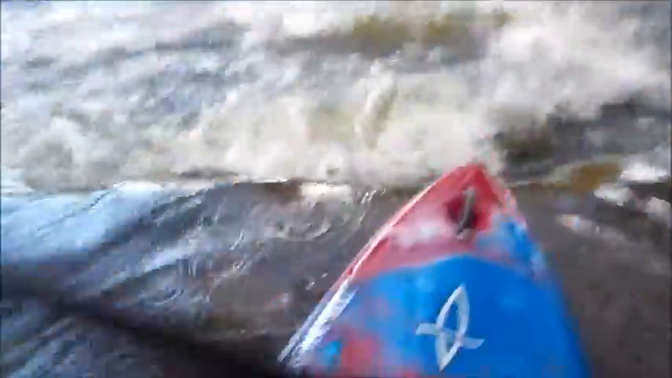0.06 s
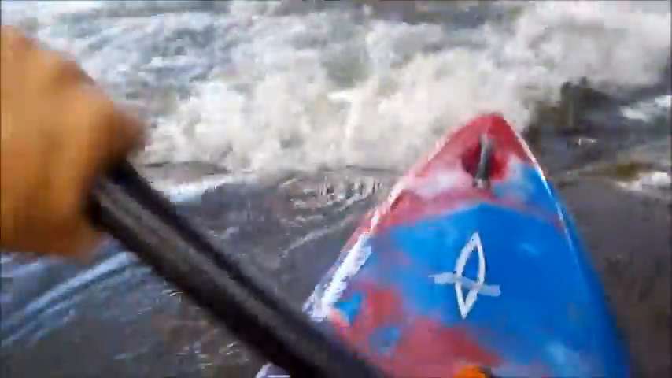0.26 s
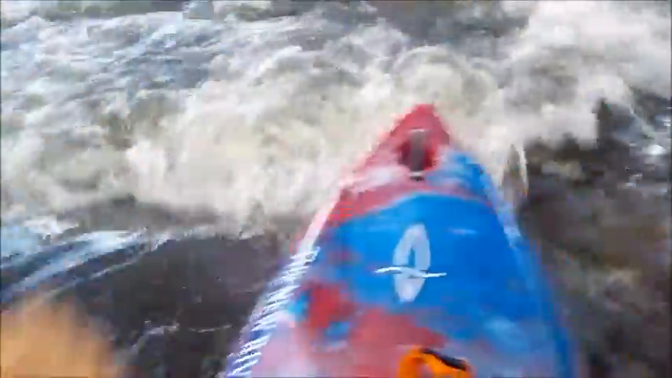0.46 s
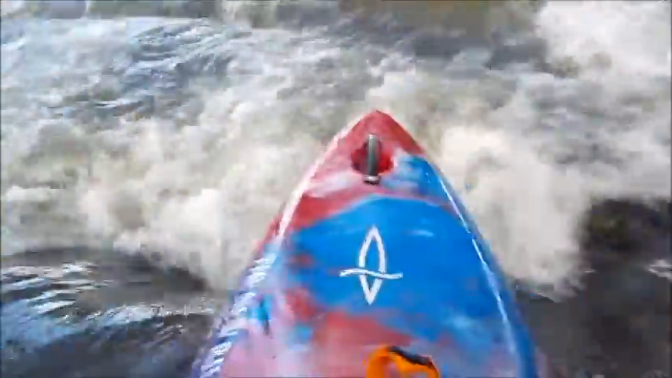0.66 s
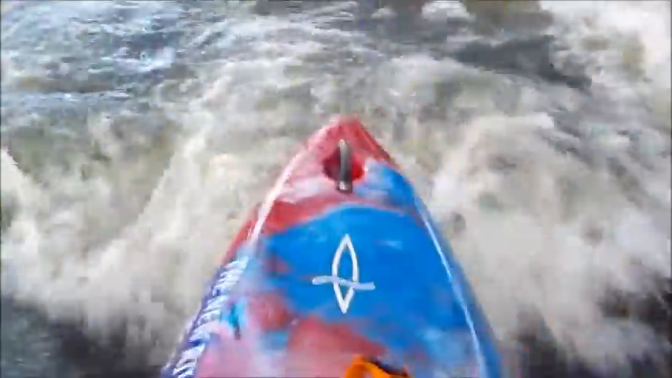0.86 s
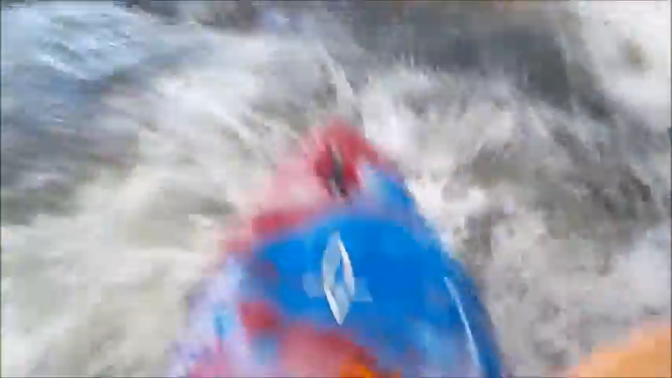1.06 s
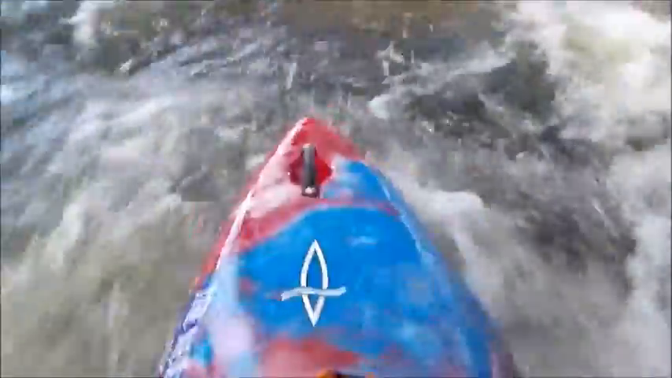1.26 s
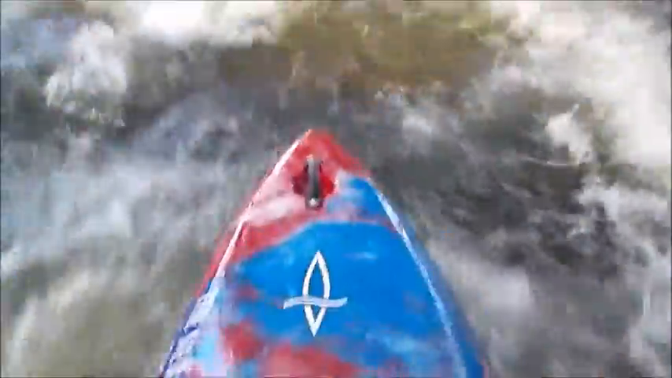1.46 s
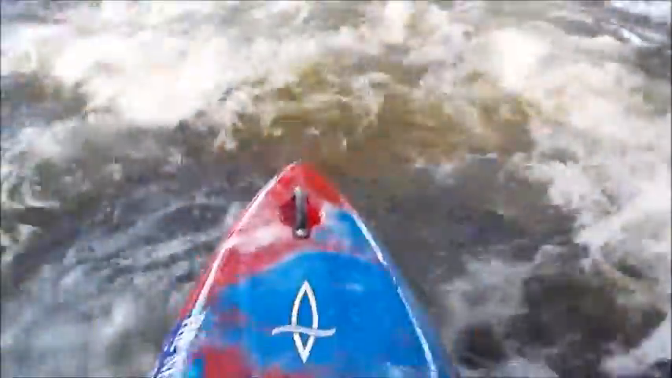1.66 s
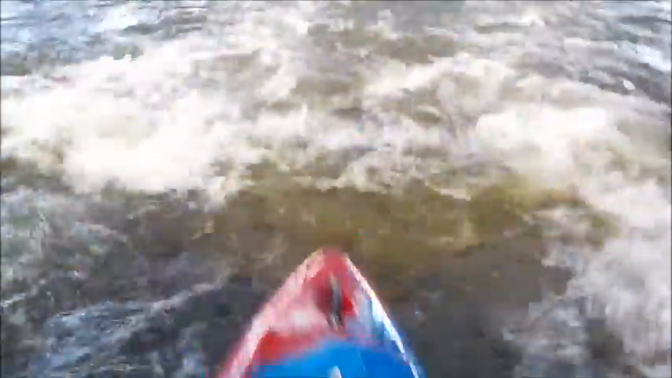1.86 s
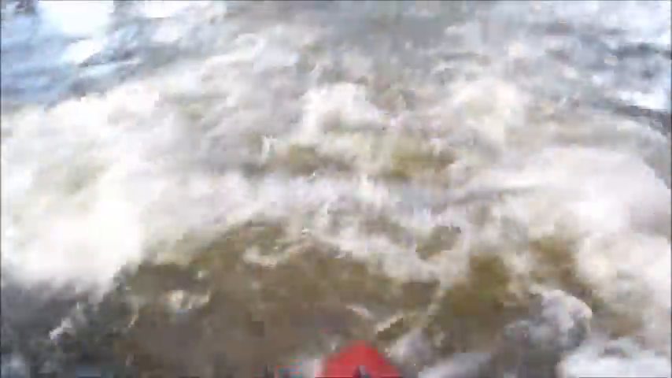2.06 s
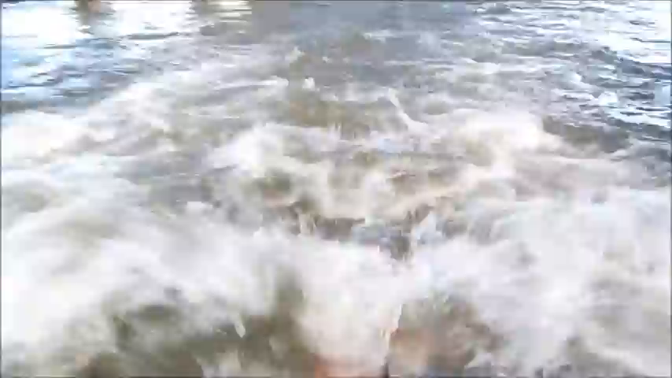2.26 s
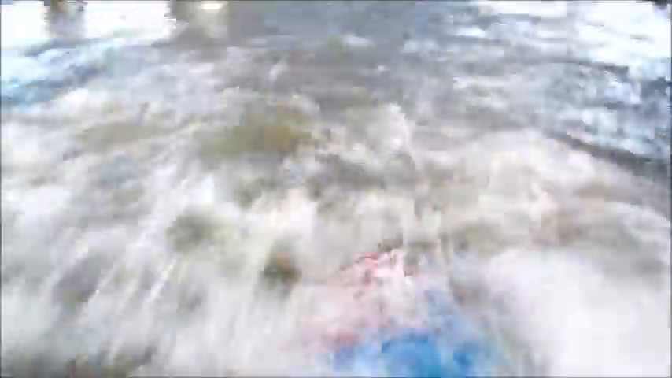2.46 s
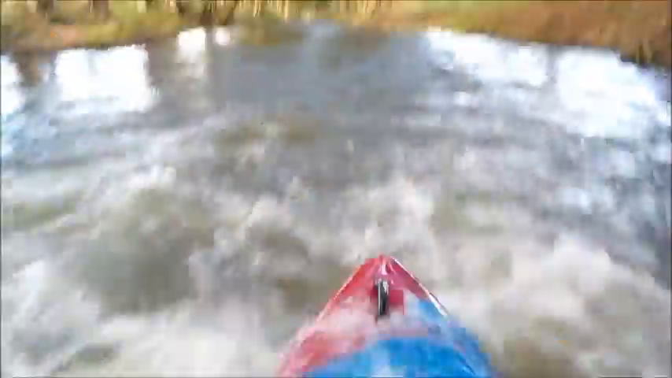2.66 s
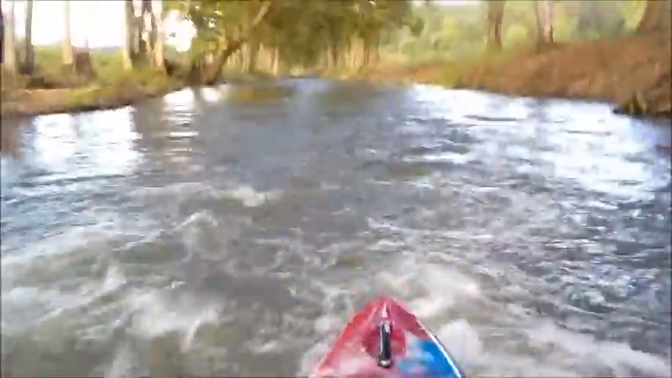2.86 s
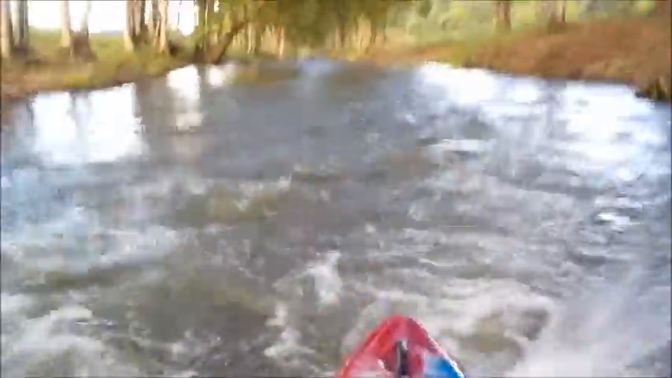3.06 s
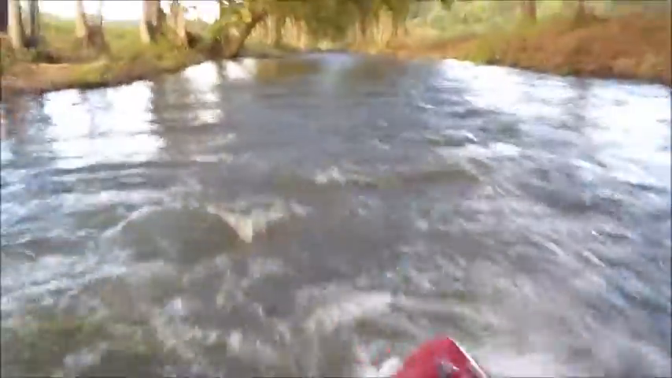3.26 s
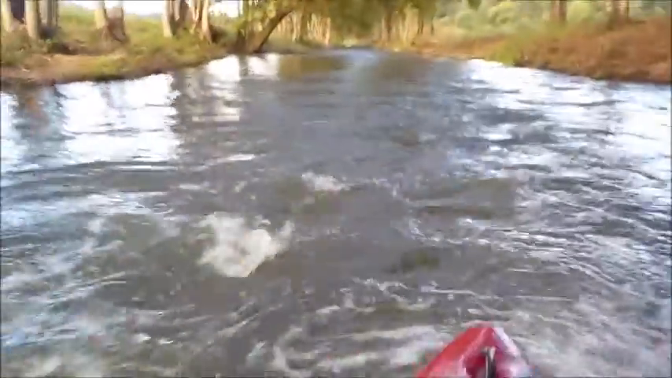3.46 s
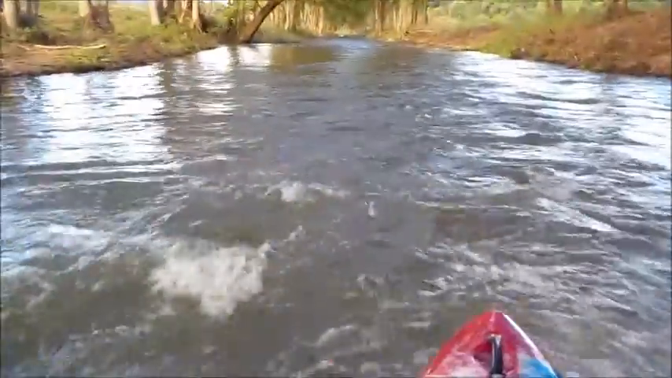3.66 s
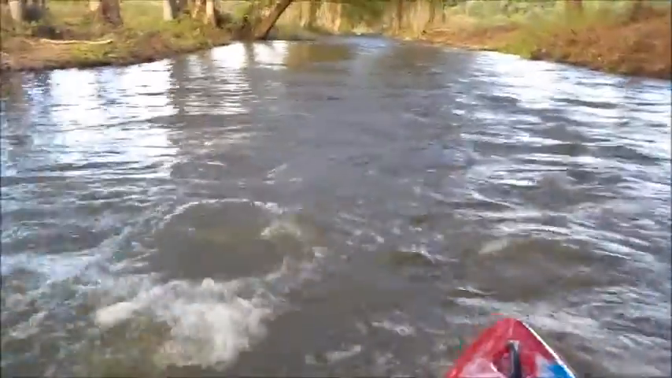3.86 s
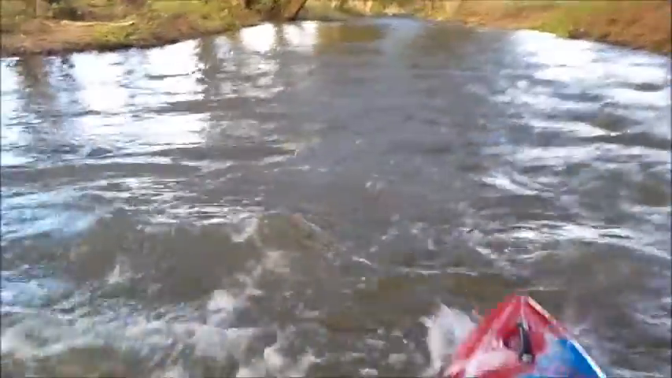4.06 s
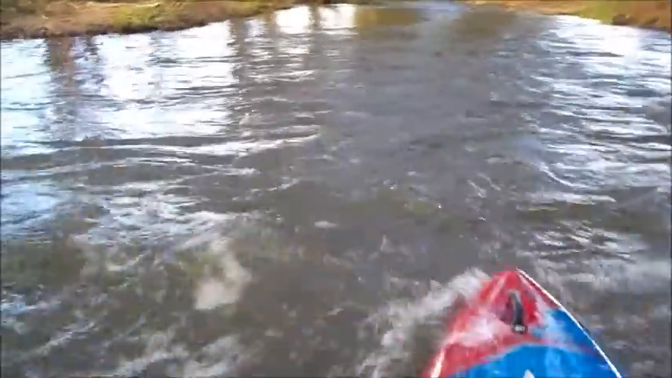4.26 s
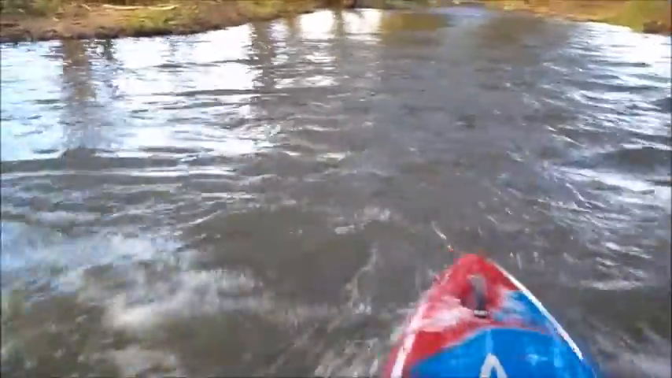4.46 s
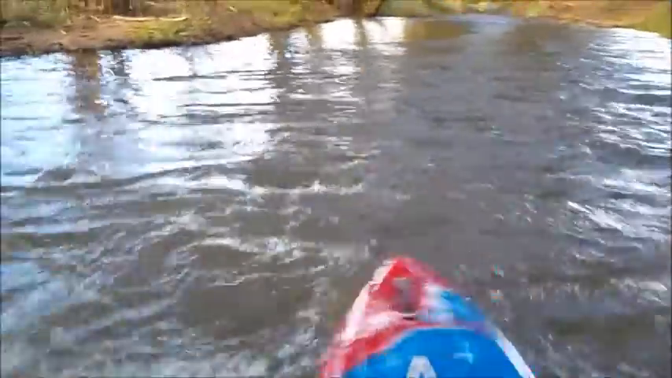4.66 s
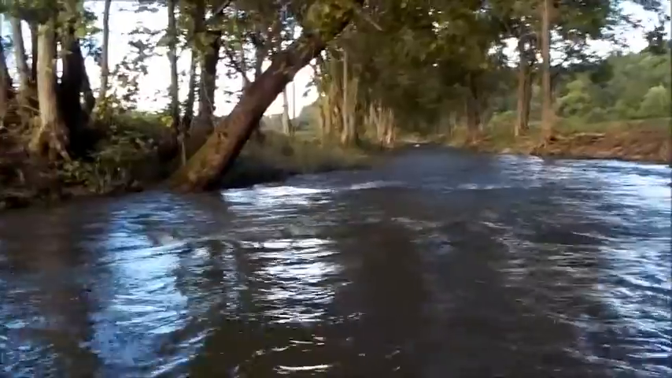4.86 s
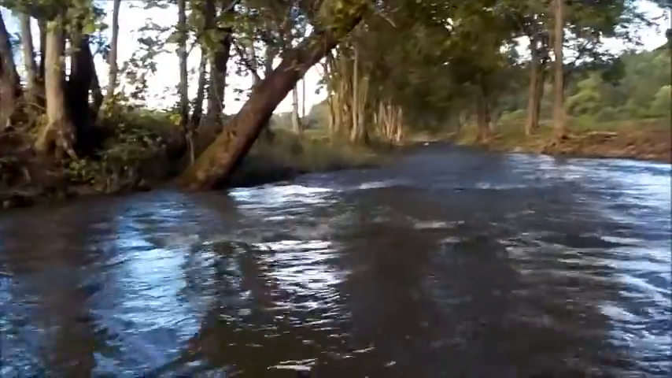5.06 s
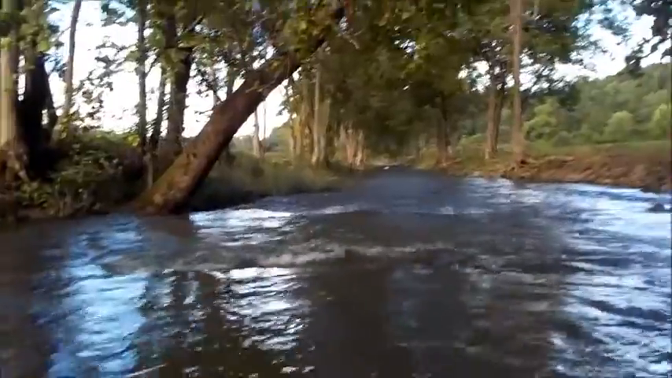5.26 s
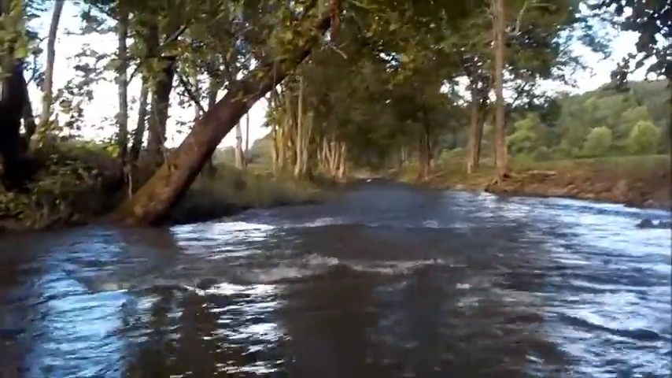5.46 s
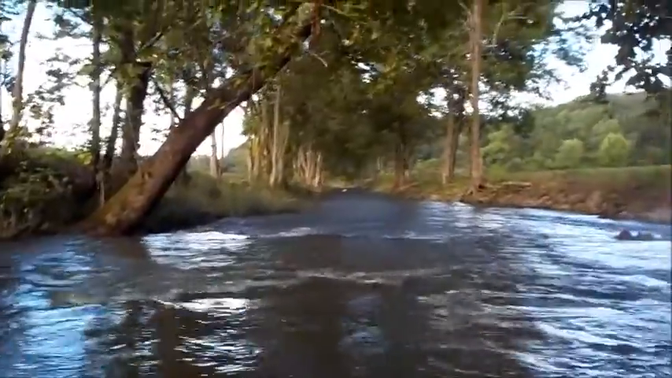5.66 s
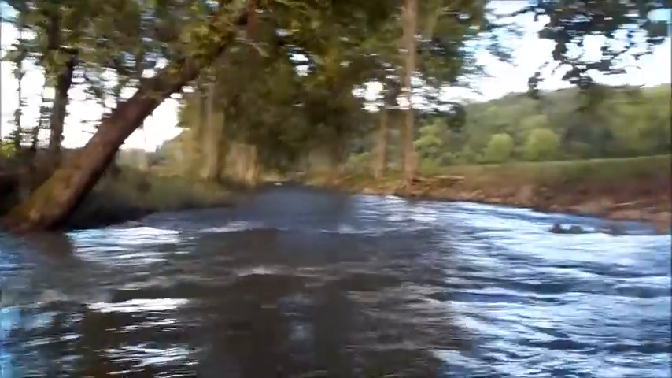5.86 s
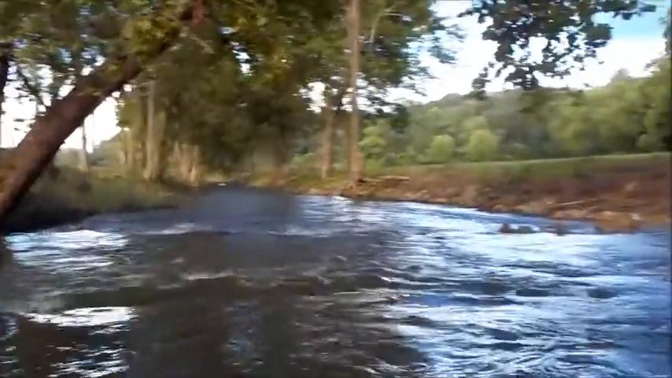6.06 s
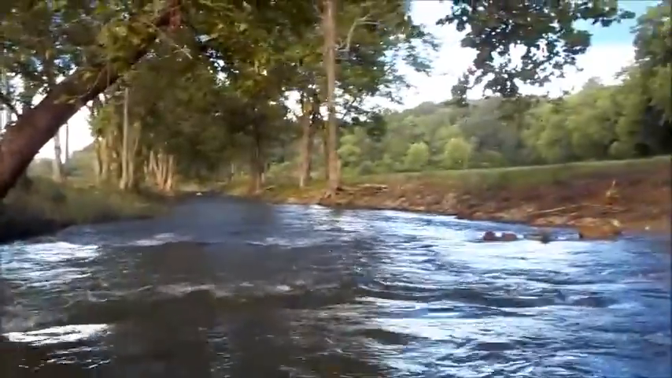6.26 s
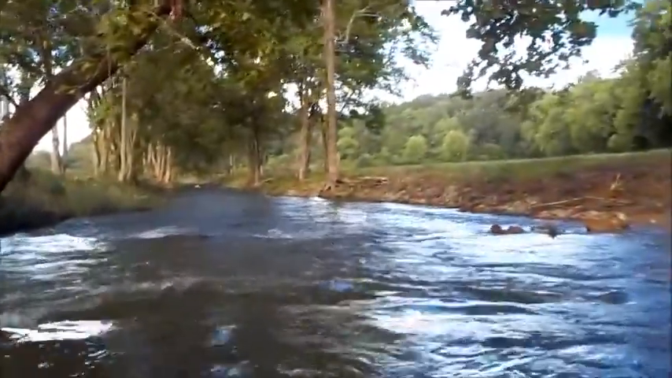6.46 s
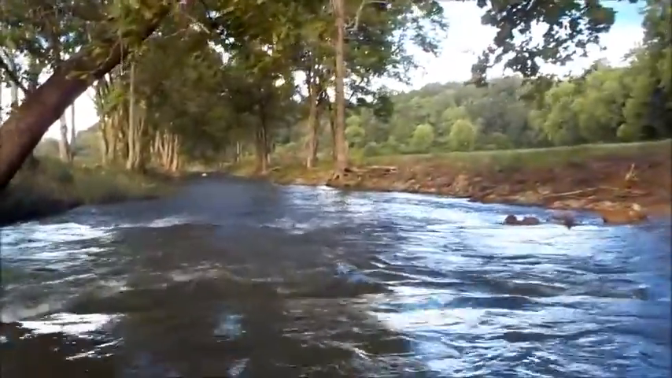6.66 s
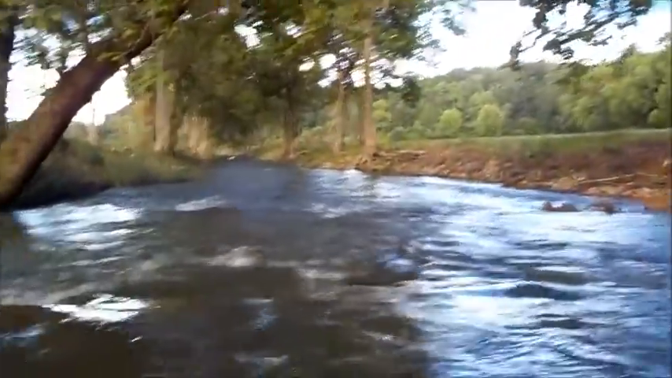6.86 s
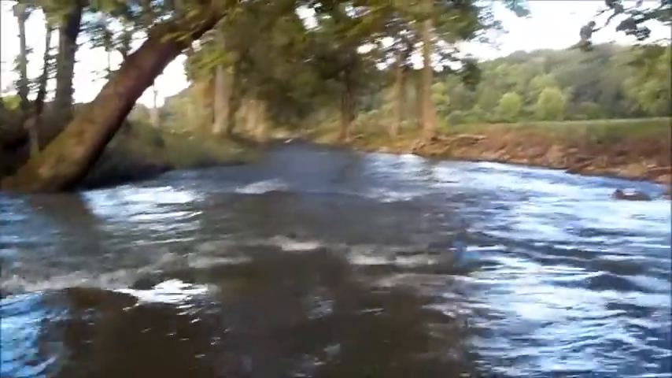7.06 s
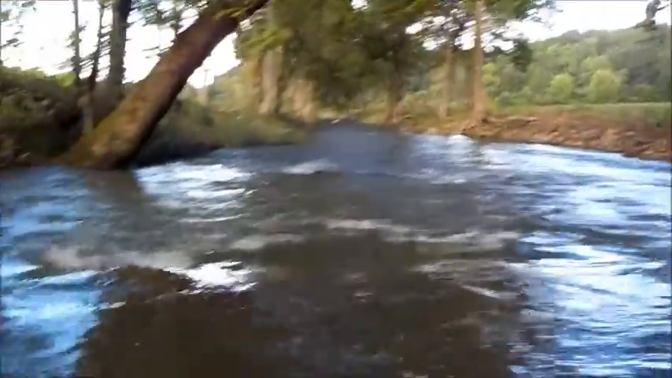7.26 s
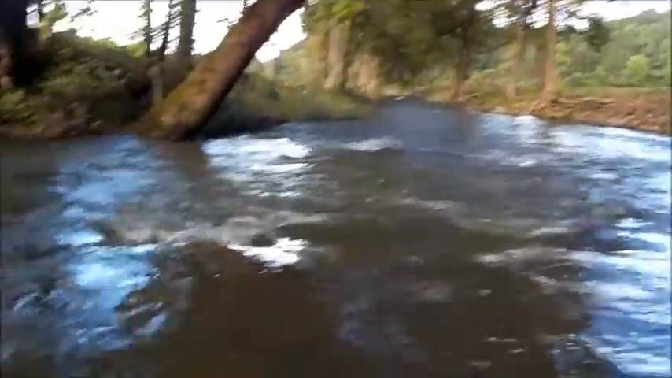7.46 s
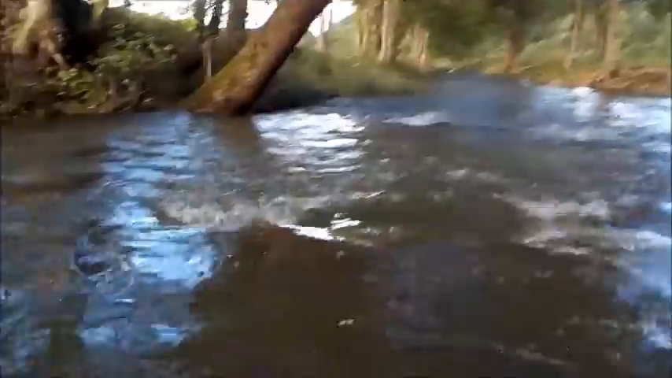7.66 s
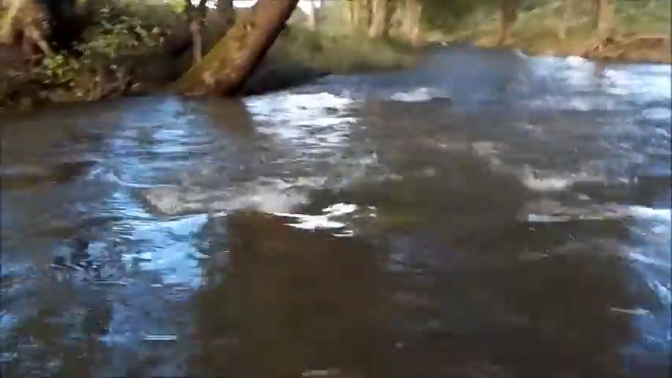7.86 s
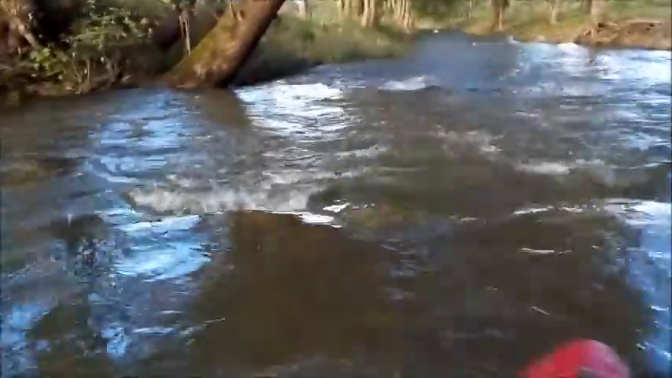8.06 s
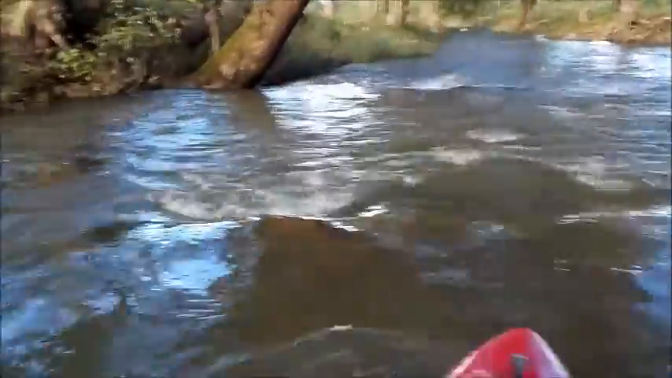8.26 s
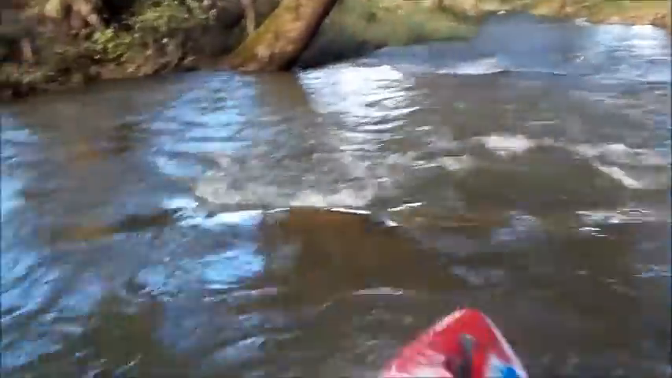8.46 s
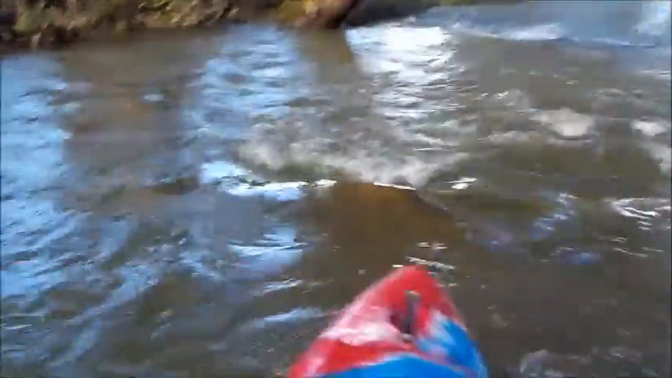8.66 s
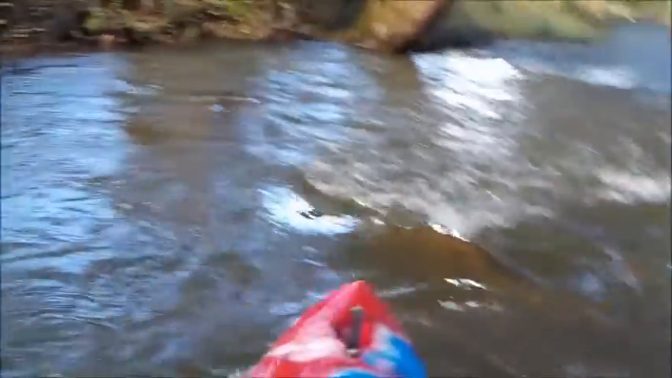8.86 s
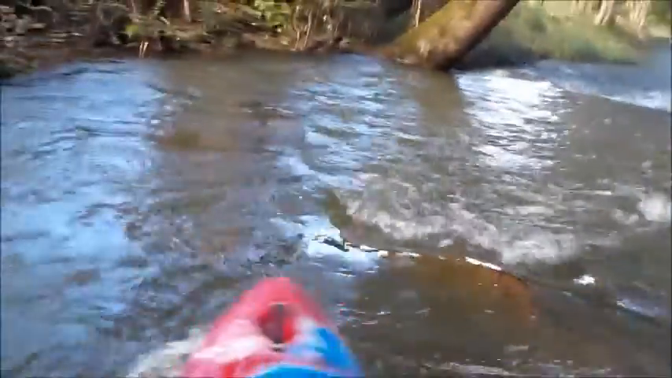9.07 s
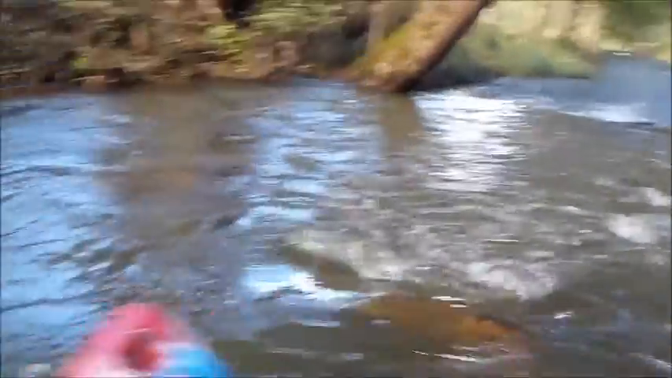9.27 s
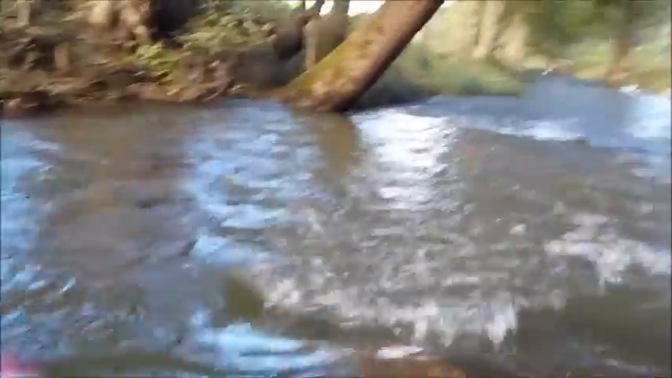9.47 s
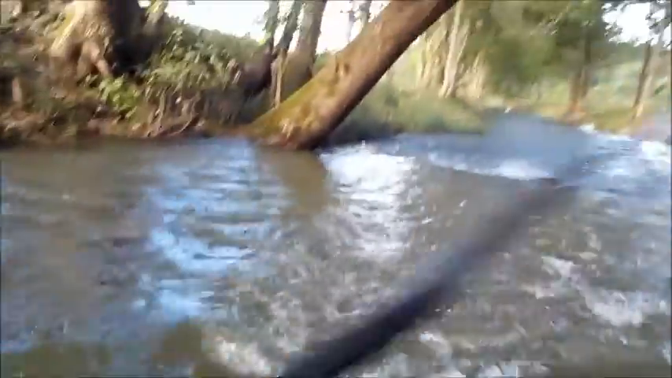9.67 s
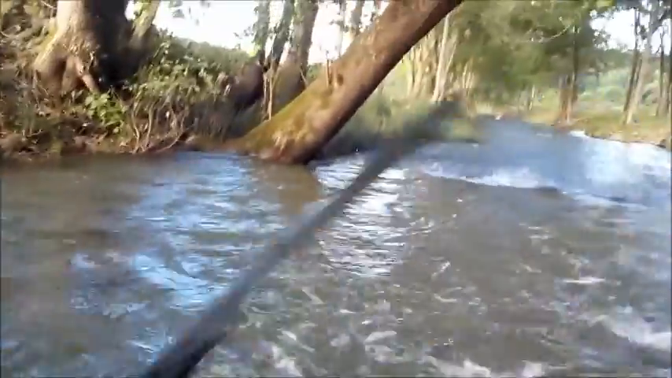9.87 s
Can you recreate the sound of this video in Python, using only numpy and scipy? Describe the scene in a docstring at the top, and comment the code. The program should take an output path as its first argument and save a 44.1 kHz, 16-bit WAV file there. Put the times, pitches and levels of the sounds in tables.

```python
"""A loud rush of white water comes first, as a small boat drops through it; then the place changes at once
and the boat drifts toward a smaller riffle. The rush and fizz are noise plus thousands of tiny bubble rings.
Single rings stand out, mostly bubbles, and water knocks dully at the hull as short low puffs of noise. Short
high clicks, mostly right, are noise bursts like a recorder overloading in the loud rush. Low lumpy noise and
a faint hiss lie underneath. A closed camera housing thins the bass; the sound has dips, one deep near 8 kHz."""
import sys
import numpy as np
from scipy import signal
from scipy.fft import rfft, irfft, next_fast_len
from scipy.io import wavfile
from scipy.ndimage import uniform_filter1d

SR = 44100
rng = np.random.default_rng(int(sys.argv[2]) if len(sys.argv) > 2 else 0)


def pcm_store(signal):
    """Save signal as 16-bit PCM."""
    levels = np.round(np.clip(np.atleast_2d(signal), -1, 1) * 32767)
    wavfile.write(sys.argv[1], SR, levels.astype(np.int16).T)


def attenuation_scalar(level_db):
    """Turn a level in dB into a linear amplitude multiplier (20 dB per decade)."""
    decades = np.asarray(level_db, float) / 20
    return 10 ** decades


N = 437913  # length in samples
PORT_GAP_S = .000064  # time sound takes to travel between the two microphone ports


def evened(x):
    """Scales a sound to an average strength (rms) of 1."""
    return x / np.sqrt(np.mean(x ** 2) + 1e-20)


def read(points, hz, order=1):
    """Reads one column of a table between its points, over log frequency."""
    table = np.transpose(points)
    return np.interp(np.log(hz + 1), np.log(table[0] + 1), table[order])


def add(mix, s, sound):
    """Mixes a sound in at time s, cutting what runs past the end."""
    part = mix[:, round(s * SR):][:, :sound.shape[1]]
    part += sound[:, :part.shape[1]]


def filtered(x, response):
    """Makes each frequency louder or softer, as a function of Hz says."""
    size = next_fast_len(N + 4096)
    hz = np.fft.rfftfreq(size, 1 / SR)
    return irfft(rfft(x, size) * response(hz), size)[..., :N]


def bubble(hz, cycles, rise, late_s=0.):
    """A ring that swells and dies in a few cycles; its pitch climbs as the bubble nears the surface."""
    t = np.arange(0, 4 * cycles / hz, 1 / SR)
    turns = np.maximum(t - 1 / 8000 - late_s, 0) * hz
    life = turns / cycles
    envelope = life ** 1.4 * np.exp(-4.2 * life)
    return np.sin(2 * np.pi * turns * (1 + rise * life)) * envelope


# nearness of the white water, one table for each of two stretches of river:
# (time [s], rush level [dB], fizz level minus rush level [dB])
RIVER_STRETCHES = [
    [(0.0, -26, -7.5), (0.55, -25, -5.5), (1.1, -21.5, -7), (2.0, -21.5, -7), (2.95, -22.5, -7.5),
     (3.4, -26.5, -6.5), (3.9, -28, -7), (4.35, -30, -7.5), (4.74, -28, -10.5)],
    [(4.76, -36, -8), (5.7, -36.5, -7), (6.4, -35, -8), (7.5, -35, -7), (7.9, -34.2, -7),
     (8.5, -34.5, -6.5), (9.1, -32.5, -8), (9.4, -34.5, -6.5), (9.9, -31.5, -7)],
]
# waves that break or slap beside the hull and swell the water briefly:
# (time of the top [s], rush rise [dB], fizz rise [dB])
WAVE_SURGES = [(.4, 2.5, 2.5), (.64, 3.5, -1), (1.06, 0.5, -2), (2.07, 1, 0), (2.17, 2.5, 2),
               (2.3, 2.5, 3.5), (2.5, 0.5, 2.5), (2.7, 0.5, 1), (3.02, 1.5, 2), (3.26, 1, 1), (4.38, 1, 0),
               (4.65, -0.5, 2.5), (5.49, 0.5, 1.5), (7.23, 1.5, 1.5), (7.725, 3, 1), (7.775, 2, 0),
               (8.38, 2.5, 0.5), (8.84, 1.5, 0), (9.12, 1, 2), (9.42, 1.5, 1.5)]


def follow(order):
    """Level of the rush (1) or fizz (2) in dB at every sample: nearness of the water plus the surges."""
    change_s = 4.7525  # the place changes from one sample to the next
    rise_s, fall_s = 0.032, 0.031
    t = np.arange(N) / SR
    levels = []
    for stretch in RIVER_STRETCHES:
        columns = np.transpose(stretch)
        levels.append(np.interp(t, columns[0], columns[1:order + 1].sum(0)))
    coarse = np.arange(0, N / SR, .004)  # surges are worked out every 4 ms
    swell_db = np.zeros(len(coarse))
    for row in WAVE_SURGES:
        width_s = np.where(coarse < row[0], rise_s, fall_s)
        swell_db += row[order] * np.exp(-((coarse - row[0]) / width_s) ** 2)
    first, second = levels
    return np.where(t < change_s, first, second) + np.interp(t, coarse, swell_db)


def far_wash(patchy_db, flicker_db):
    """Bubbles too many to tell apart: noise from all sides, in drifting patches and brief shared bursts."""
    frames, hz = N // 128 + 5, np.fft.rfftfreq(512, 1 / SR)
    a, b, c, d, patches = rng.standard_normal((frames, 257, 5)).T
    patches = uniform_filter1d(patches, size=8, axis=0)  # spread over frequency
    patches = evened(uniform_filter1d(patches, size=20, axis=1))  # spread over time
    flicker = evened(uniform_filter1d(rng.standard_normal(frames), size=12))
    same = np.sinc(2 * hz * PORT_GAP_S)[:, None]  # how alike two close ports hear sound from all sides
    left, other = a + 1j * b, c + 1j * d
    z = np.array([left, same * left + np.sqrt(1 - same ** 2) * other])
    z *= attenuation_scalar(patchy_db * patches + flicker_db * flicker)
    return evened(signal.istft(z, nperseg=512, noverlap=384)[1][:, :N])


def near_bubbles(per_s, spread_db, cycles, count=48):
    """Bubbles of many sizes and directions burst at random; a few are large."""
    bursts = rng.random(N) < per_s / SR
    size = attenuation_scalar(spread_db * np.minimum(rng.exponential(1, N), 5)) * bursts
    kind, out = rng.integers(0, count, N), np.zeros((2, N))
    pitch_climb = 0.093
    for k, hz in enumerate(np.geomspace(250, 7500, count)):
        side = rng.uniform(-0.053, 1) * PORT_GAP_S / 2  # mostly reaches the right port first
        ring = np.array([bubble(hz, cycles, pitch_climb, late_s) for late_s in (side, -side)])
        ring *= np.sqrt(hz) / np.linalg.norm(ring[0])  # equal energy in every Hz
        out += signal.oaconvolve((size * (kind == k))[None], ring, axes=1)[:, :N]
    return evened(out)


# overall colour of the river sound, without its dips: (frequency [Hz], level [dB])
RIVER_COLOUR = [(30, -54), (100, -48), (200, -24.5), (400, -10), (700, -2.5), (1000, -2.5), (1600, -3.5),
                (2100, -7), (3700, -14), (4800, -18.5), (6100, -9), (7000, -12.5), (7600, -27.5),
                (8800, -38), (11000, -50.5), (16000, -76)]
# dips in the sound; the deep one near 8 kHz comes from resampling of 16 kHz audio:
# (frequency [Hz], half width [Hz], depth [dB])
COLOUR_DIPS = [(2393, 176, 25), (3041, 150, 13.5), (5165, 170, 6), (8080, 145, 48)]
# right port against left: (frequency [Hz], level difference [dB], lead [radians])
RIGHT_AGAINST_LEFT = [(100, -1, 0), (200, 3.5, 0), (2000, 2.5, 0), (4970, 1.7, 0), (5600, 0.5, 0),
                      (7030, 1.5, 0), (7200, 8.5, 0.27), (8800, -1, 0)]


def colour(hz):
    """Bass thinned by the closed housing, a falling treble, dips, and a difference between the ports."""
    db = read(RIVER_COLOUR, hz)
    for f, width, depth in COLOUR_DIPS:
        db = db - depth / (1 + ((hz - f) / width) ** 2)
    # each port takes half of the difference
    half_level = attenuation_scalar(read(RIGHT_AGAINST_LEFT, hz) / 2)
    half_lead = np.exp(.5j * read(RIGHT_AGAINST_LEFT, hz, order=2))
    half = half_level * half_lead
    return attenuation_scalar(db) * np.array([1 / half, half])


def rapids():
    """Coloured wash and bubbles; rush and fizz follow the boat's way down the river."""
    wash = far_wash(patchy_db=0.67, flicker_db=0.38)
    bubbles = attenuation_scalar(-10.5) * near_bubbles(per_s=3000, spread_db=2.77, cycles=5.13)
    water = filtered(wash + bubbles, colour)
    rush = filtered(water, lambda hz: hz < 2420)  # rush lies below, fizz above
    fizz = water - rush
    rush_db, fizz_db = follow(order=1), follow(order=2)
    rumble = filtered(rush, lambda hz: 1 / (1 + (hz / 330) ** 4))
    rumble_db = 0.4 * (rush_db - rush_db.max())  # big water has more bass than a riffle
    body = rush + (attenuation_scalar(rumble_db) - 1) * rumble
    return attenuation_scalar(rush_db) * evened(body) + attenuation_scalar(fizz_db) * evened(fizz)


def buffet():
    """Lumpy low noise, unrelated at the two ports, that rises and falls with the rush."""
    below_rush_db = -57.5
    lumps_db = 5.1 * evened(uniform_filter1d(rng.standard_normal(N), size=3000))
    noise = rng.standard_normal((2, N))
    low = filtered(noise, lambda hz: 1 / (1 + (70 / (hz + 1)) ** 3) / (1 + (hz / 190) ** 3))
    return attenuation_scalar(below_rush_db + follow(order=1) + lumps_db) * evened(low)


# single short rings, mostly bubbles; the one near 6.6 kHz is a brief high chirp or click.
# The level is midway between the ports, before the bass is thinned:
# (time [s], peak level [dB], pitch [Hz], length [cycles])
SINGLE_RINGS = [(.389, -16, 1320, 7.1), (0.541, -37, 287, 3), (.629, -29, 875, 5.4), (1.051, -9, 1060, 5.5),
                (1.256, -32, 250, 5.1), (2.245, -11, 1410, 3.5), (2.692, -10.5, 940, 6.8),
                (3.2585, -24.5, 4100, 11), (4.385, -18, 850, 4.5), (5.478, -31, 3970, 8),
                (5.833, -28, 840, 5), (6.36, -25, 990, 6.4), (6.708, -39, 260, 4.1), (6.714, -30, 790, 3.9),
                (6.935, -27, 853, 6.2), (7.279, -27.5, 972, 11), (7.71, -25, 900, 2.9),
                (9.009, -24, 950, 1.2), (9.6257, -17.5, 6630, 11), (9.701, -31, 1460, 4),
                (9.7655, -20.5, 1450, 7.3), (9.806, -25, 1400, 6.8), (9.844, -23, 1640, 7.3)]


def single_rings():
    """Short rings that stand out of the rush, mostly bubbles, each with a slightly climbing pitch."""
    out = np.zeros((2, N))
    for s, db, hz, cycles in SINGLE_RINGS:
        ring = bubble(hz, cycles, rise=0.016)
        ports_db = db + np.array([[-1.4], [1.4]])  # stronger at the right
        add(out, s, attenuation_scalar(ports_db) * ring / abs(ring).max())
    return filtered(out, lambda hz: 1 / (1 + (150 / (hz + 1)) ** 4))  # the housing thins their bass


# dull knocks of water against the hull, level before the fades: (time [s], level [dB])
HULL_KNOCKS = [(0.952, -45), (6.704, -56), (6.935, -63), (9.628, -70)]


def thuds():
    """Low puffs of noise that die quickly, alike at both ports."""
    fade_s = .12  # time to fall by 60 dB
    out, t = np.zeros((2, N)), np.arange(6000) / SR
    low = signal.butter(2, [125, 330], "band", fs=SR)  # Hz
    onset = np.minimum(t / .003, 1)
    for (s, db), puff in zip(HULL_KNOCKS, rng.standard_normal((len(HULL_KNOCKS), len(t)))):
        knock = attenuation_scalar(db - 60 * t / fade_s) * evened(signal.lfilter(*low, puff)) * onset
        add(out, s, knock * np.ones((2, 1)))
    return out


# the stronger clicks of the recorder overloading, level at the right port before the low sound is cut:
# (time [s], level [dB])
OVERLOAD_CLICKS = [(1.034, -36), (1.2361, -31), (1.289, -28), (1.3818, -31), (1.6127, -36), (1.6736, -26),
                   (1.8188, -29), (1.8397, -25), (1.8721, -26), (1.923, -36), (2.039, -28), (2.1794, -30),
                   (2.2453, -29), (2.2682, -24), (2.354, -22), (2.4039, -34), (2.5002, -28), (2.5553, -21),
                   (2.5985, -26), (2.6489, -26), (2.6928, -31), (2.7492, -31), (3.0086, -27), (3.481, -37)]


def overload_clicks(per_s, small_db):
    """Short high noise bursts of an overloading recorder: listed ones, and small random ones in clumps."""
    from_s, to_s, edge_s = 1.05, 2.85, 0.094  # small clicks come in this part of the loud rush
    now = np.arange(N) / SR
    inside = (np.tanh((now - from_s) / edge_s) - np.tanh((now - to_s) / edge_s)) / 2
    clumps_db = 8.3 * evened(uniform_filter1d(rng.standard_normal(N), size=2000))
    clicks = rng.random((2, N)) < per_s / SR * inside * attenuation_scalar(clumps_db)  # clumps change how likely a click is
    sizes_db = small_db + 2.2 * np.minimum(rng.exponential(1, (2, N)), 4)
    out = attenuation_scalar(sizes_db) * clicks * [[.6], [1]]  # weaker at the left
    t = np.arange(900) / SR
    click = np.exp(-((t - .0025) / 0.00034) ** 2)
    sizzle = attenuation_scalar(-23) * np.sin(np.pi * t / t[-1]) ** 2
    for (at, db), burst in zip(OVERLOAD_CLICKS, rng.standard_normal((len(OVERLOAD_CLICKS), 2, 900))):
        # a click at -50 dB is alike at both ports; the left loses this share of every dB above that
        left_db = db - 0.57 * (db + 50)
        add(out, at - .0012, attenuation_scalar([[left_db], [db]]) * (click + sizzle) * burst)
    return filtered(out, lambda hz: 1 / (1 + (8700 / (hz + 1)) ** 24))  # keeps the high part only


def scene():
    """The river as it reaches both ports, with the clicks of the overloading recorder."""
    return rapids() + buffet() + single_rings() + thuds() + overload_clicks(per_s=200, small_db=-36.5)


def low_pass(x):
    """Removes everything above the highest recorded frequency."""
    return signal.sosfilt(signal.butter(12, 15770, fs=SR, output="sos"), x)


def record(dry):
    """Adds a faint hiss above about 8 kHz, where the resampled sound ends."""
    noise = rng.standard_normal((2, N))
    hiss = filtered(noise, lambda hz: (hz / 12000) ** 0.19 / (1 + (7800 / (hz + 1)) ** 30))
    ports_db = -66.5 + np.array([[-1.5], [1.5]])  # stronger at the right
    finished = dry + attenuation_scalar(ports_db) * hiss
    return low_pass(finished)


dry = scene()
out = record(dry)
pcm_store(out)
```